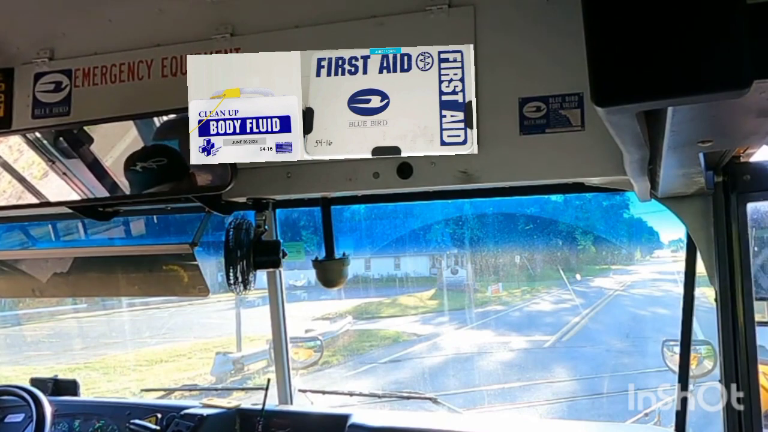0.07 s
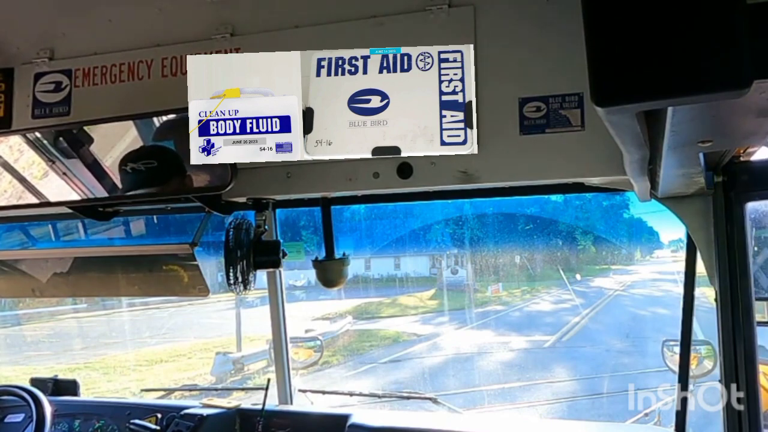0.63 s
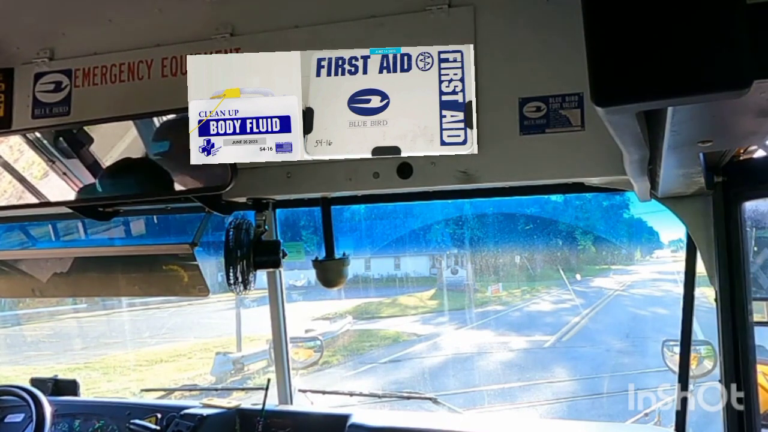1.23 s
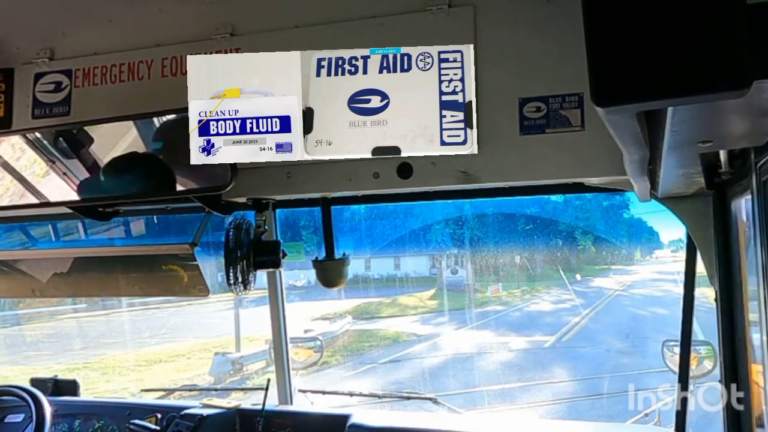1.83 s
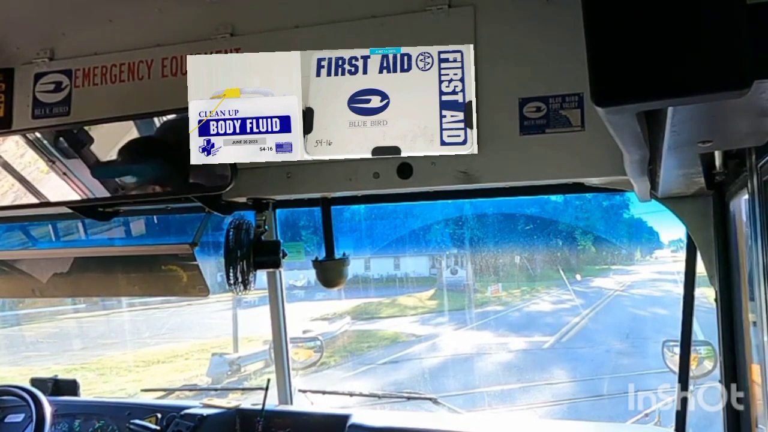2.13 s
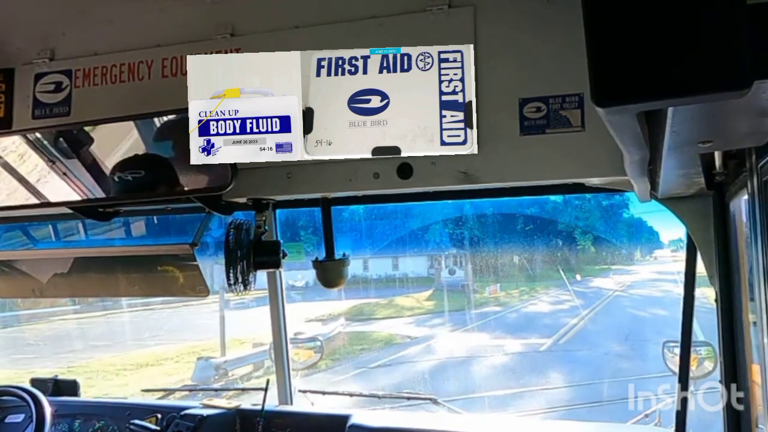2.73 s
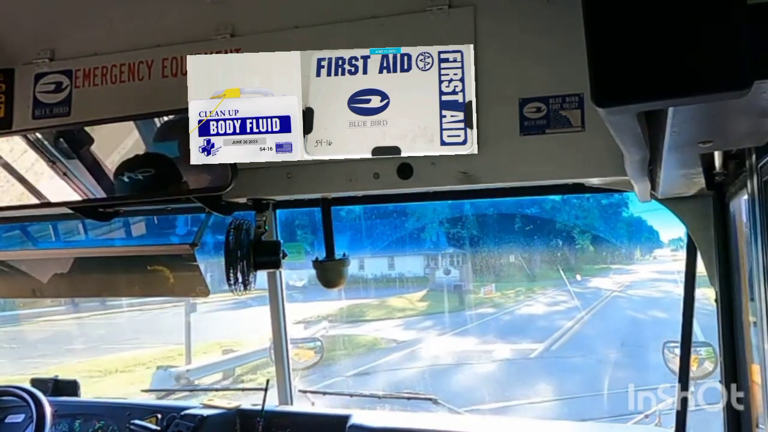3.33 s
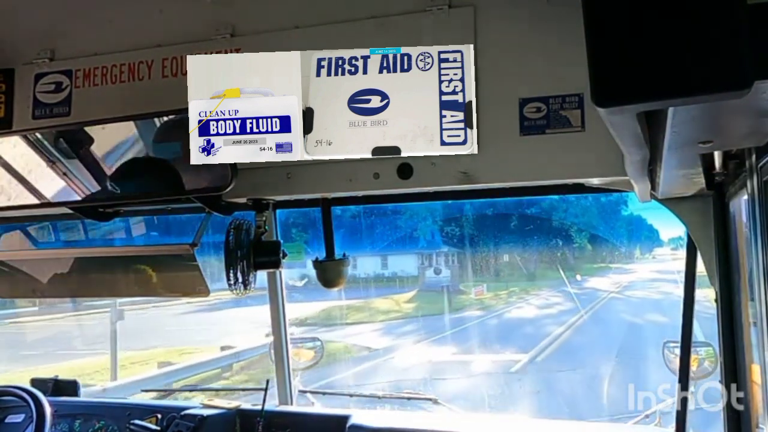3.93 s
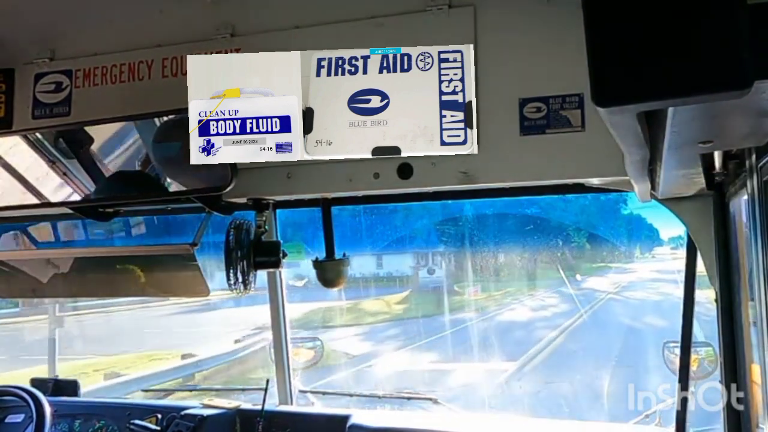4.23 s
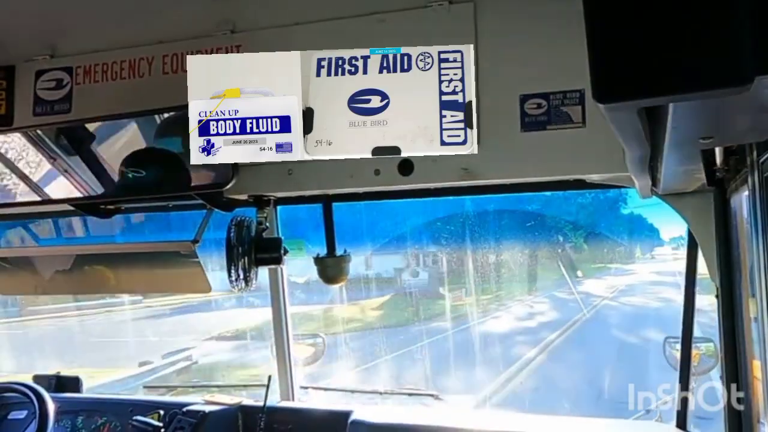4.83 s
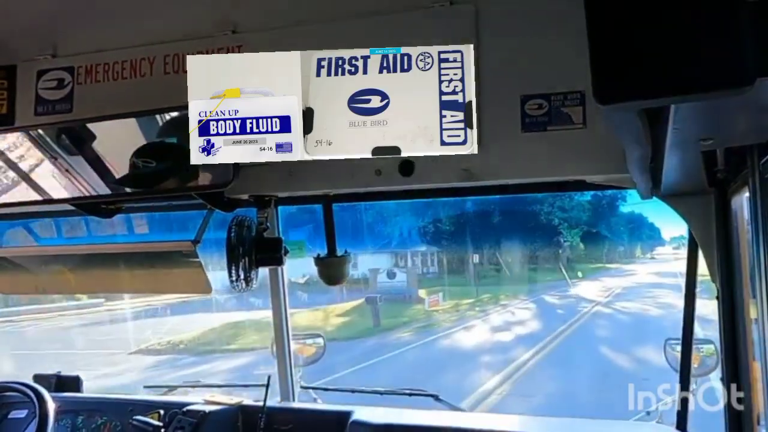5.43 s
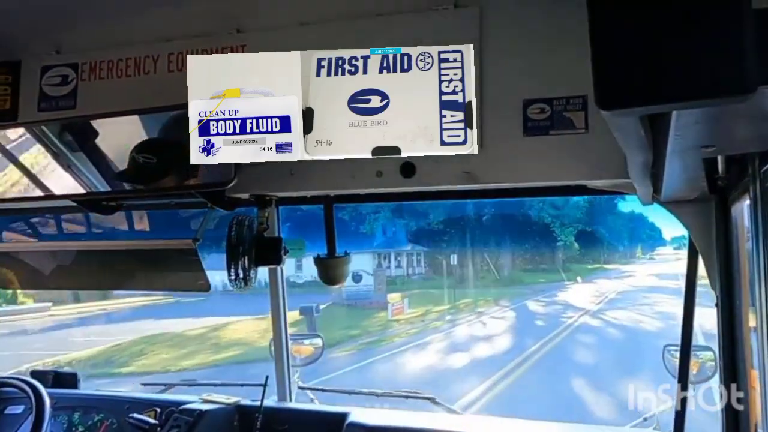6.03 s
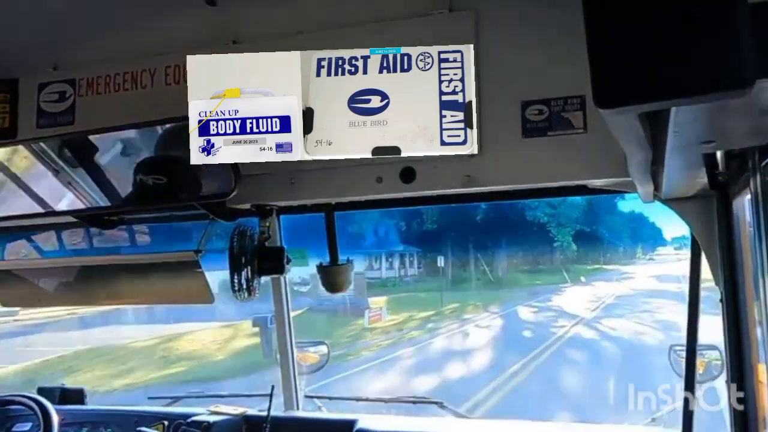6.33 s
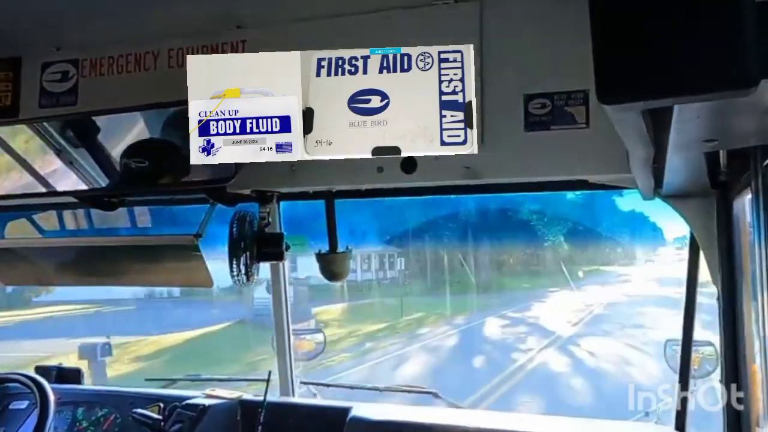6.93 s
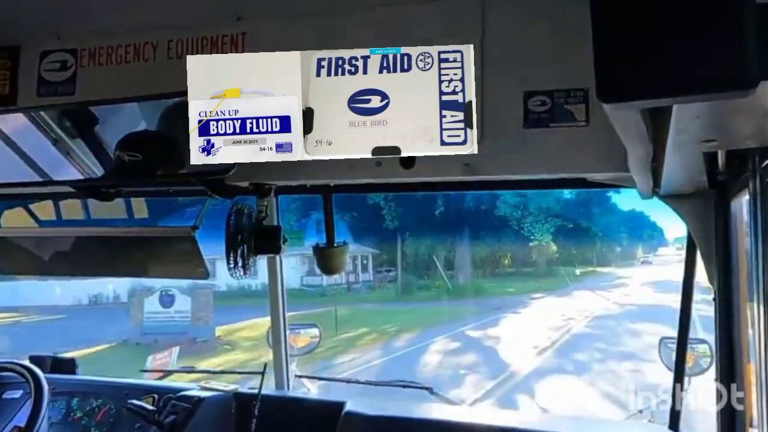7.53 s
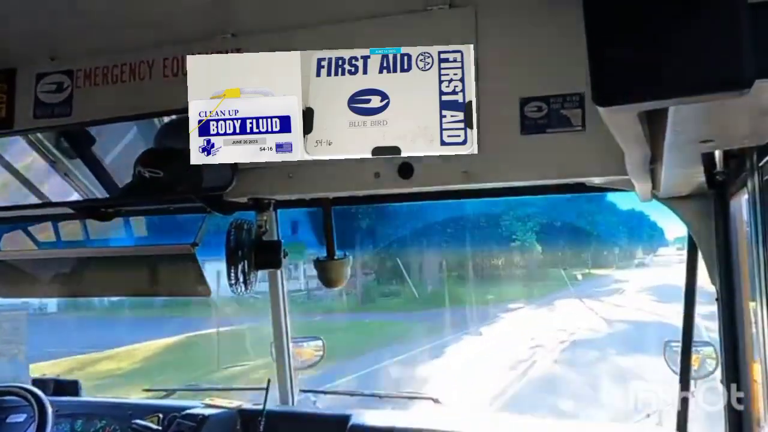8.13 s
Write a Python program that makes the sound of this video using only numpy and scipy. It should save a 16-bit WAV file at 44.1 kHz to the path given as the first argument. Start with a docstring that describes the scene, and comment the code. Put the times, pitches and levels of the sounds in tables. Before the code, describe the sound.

Heard from behind the driver inside a school bus, a diesel engine idles with a low, knocking throb. Air hisses from the door at the start and slowly fades, while the hinge gives several short, thin squeals up to about 1.4 seconds. The door bumps lightly, then shuts with a solid thud at about 2 seconds, and the hiss dies away by 3. The bus pulls away at once, the engine rising in pitch and booming through the cabin as tyre rumble grows. The pitch dips with gear changes at around 4.5 and 6 seconds. Loose trim ticks throughout, most clearly near 4.6 seconds, with a few faint seat chirps. From about 5 to 7.5 seconds, bumps bring low heaves and light panel rattles. A latch clacks sharply near 7.8 seconds as the engine drone swells again.

```python
"""Air hisses from a school bus door over the low throb of an idling six-cylinder diesel.
Heard from behind the driver, the door's hinge squeals and its two leaves thud shut.
The bus pulls away and shifts up twice: the exhaust makes the cabin boom, and each firing of a
cylinder knocks on the engine block. The tyres rumble, bumps shake the panels, and loose
fittings tick, chirp and clack."""
import sys
import numpy as np
from scipy import signal
from scipy.fft import rfft, irfft, next_fast_len
from scipy.io import wavfile
from scipy.ndimage import uniform_filter1d

SR = 44100
rng = np.random.default_rng(int(sys.argv[2]) if len(sys.argv) > 2 else 0)


def generate_wav(sig):
    """Save sig (samples, or channels by samples) to the path in sys.argv[1] as 16-bit PCM at SR."""
    pcm = np.round(np.clip(np.atleast_2d(sig).T, -1, 1) * 32767).astype(np.int16)
    wavfile.write(sys.argv[1], SR, pcm)


N = 361179
T = np.arange(N) / SR

# the tone colour of each noise: (frequency [Hz], relative level [dB])
HEAVE_SPECTRUM = [(8, 0.5), (18, 10.5), (33, 9.5), (45, 5.5), (60, -18), (100, -49)]
TYRE_SPECTRUM = [(35, -2.5), (58, -3), (78, 0.5), (100, -7.5), (123, -2.5), (150, -9), (200, -19.5),
                 (300, -56), (600, -57)]
ROAR_SPECTRUM = [(60, -6), (150, -6), (230, 6), (300, 2.5), (360, -1.5), (430, -3), (500, -8.5), (590, -4),
                 (820, -6.5), (1150, -6.5), (1800, -10.5), (2700, -16), (4000, -51)]
BUZZ_SPECTRUM = [(1500, -13.5), (2600, 0), (3200, -2), (4200, -2), (5300, -3), (6000, -11), (7300, -11),
                 (8200, -20), (10000, -26), (13000, -38.5)]
TICK_SPECTRUM = [(700, -23.5), (2200, -3.5), (3800, 6.5), (5500, 4), (7500, 0), (9500, -10), (13000, -17)]
LATCH_SPECTRUM = [(150, -18), (400, 11.5), (650, 1.5), (1300, 2.5), (1900, 2), (2500, -3), (3200, 5),
                  (4200, -6), (6000, -3.5), (8500, -12), (13000, -25)]
AIR_SPECTRUM = [(500, 1), (1200, -10.5), (2900, 0.5), (5000, -7.5), (6800, -0.5), (7650, -0.5),
                (8300, -3.5), (9500, -6), (11000, -10.5), (12200, -9.5), (13300, -27)]
THUD_SPECTRUM = [(40, -6), (95, 8), (160, 0), (260, 4.5), (380, -8), (520, -1.5), (700, -8.5), (1050, -7),
                 (1500, -7), (2100, -14.5), (3000, -19.5), (4200, -24), (7000, -32.5), (9000, -45),
                 (13000, -44)]
# how alike noise is at the two ears: (frequency [Hz], likeness [0-1])
EAR_LIKENESS = [(60, 1), (130, 0.91), (300, 0.97), (1200, 0.8), (2200, 0.67), (5000, 0.64), (12000, 0.73)]

# bumps in the road: (time [s], heave level [dB], relative rattle rate [dB])
ROAD_BUMPS = [(3, -21, -15), (5.25, -13.5, -13), (5.8, -14, -3), (6.08, -12, -1), (6.3, -26, -3),
              (6.52, -13.5, -0.5), (6.9, -18, -2), (7.25, -16, -10.5)]
# low drones of the body and one faint engine whine:
# (time [s], length [s], start pitch [Hz], end pitch [Hz], level [dB])
GLIDING_HUMS = [(3.257, 0.6, 30.88, 38.3, -20.5), (4.358, 0.45, 67, 79, -22),
                (5.651, 0.33, 116.5, 123, -21.5), (6.178, .6, 169, 180.6, -31), (6.147, 1.9, 430, 412, -51),
                (6.98, 0.26, 116, 107.5, -23.5)]
# ticks of loose trim and chirps of a seat frame: (time [s], relative level [dB])
TRIM_TICKS = [(0.62, -28.5), (0.85, -29.5), (0.865, -34), (1.569, -37), (1.594, -30), (1.755, -31),
              (2.247, -36), (2.429, -31), (3.340, -33.5), (3.379, -34), (3.44, -29.5), (3.455, -36),
              (4.641, -25), (4.655, -24), (4.674, -35), (5.093, -35.5), (5.873, -36), (6.309, -37),
              (6.57, -35.5), (6.984, -34), (7.011, -35), (7.401, -37)]
SEAT_CHIRPS = [(2.525, -44), (3.56, -43.5), (4.60, -45), (5.35, -45), (5.63, -47), (7.61, -52)]
# where the seat frame rings: (frequency [Hz], relative level [dB])
SEAT_RINGS = [(3600, 1.7), (6250, -2)]
# clacks of a latch: (time [s], level [dB], time to fade by 60 dB [s])
LATCH_CLACKS = [(7.836, -19.5, 0.081), (7.845, -25, 0.15)]

# the door bumps and shuts: (time [s], level [dB], time to fade by 60 dB [s], push on the leaf [dB])
DOOR_THUDS = [(0.71, -29.5, 0.14, -24), (1.602, -31.5, 0.18, -35), (2.06, -13, 0.23, -18.5),
              (2.094, -19.5, 0.21, -22)]
# squeals of the hinge: (time [s], length [s], start pitch [Hz], end pitch [Hz], level [dB],
# relative overtone level [dB], wobble [share of the pitch])
HINGE_SQUEALS = [(0.03, 0.205, 830, 730, -46, -22, .014), (0.755, 0.11, 2750, 2660, -38, -4.5, .005),
                 (0.869, .085, 2432, 2364, -39.5, -10, .006), (.98, 0.12, 1240, 1140, -41, -27, .012),
                 (1.19, 0.075, 2070, 2006, -39, -25, .02), (1.276, 0.045, 1976, 2080, -41, -23, .018),
                 (1.352, 0.039, 2070, 2040, -42.5, -23, .014)]
# where a door leaf rings, and where the knocks ring in the engine block and the cabin: (frequency [Hz], width
# [Hz], relative level [dB])
LEAF_RINGS = [(95.4, 5, 3.5), (283, 35, -1), (500, 100, -34), (1060, 140, -31), (1500, 81, -40)]
KNOCK_RINGS = [(557, 83, -10.5), (1034, 51, -7), (1218, 45, -5.5), (1377, 14.2, 7.5), (1465, 126, 1.5),
               (1506.4, 64, 7), (1597, 71, -6.5), (1906, 147, -11.5), (2162, 12, -4), (2216, 21, -5),
               (2355, 19, -6), (2637, 47, -6.5), (2824, 26, -9.5)]

# the engine through three gears: (time [s], firing rate [Hz], firing tone level [dB])
ENGINE_RUN = [(2.15, 40.15, -20), (2.55, 60.5, -19), (2.85, 71, -23), (3.3, 84.5, -21), (3.6, 89.7, -20),
              (3.95, 92.5, -19.5), (4.3, 92.7, -21), (4.6, 87.5, -18), (5.0, 82.5, -19), (5.55, 95, -21),
              (5.8, 101, -30), (6.25, 76.5, -30), (6.6, 80, -28), (6.9, 79, -34), (7.17, 78, -21),
              (7.55, 77, -34), (7.78, 80.5, -18), (8.19, 82.5, -14)]
# its other tones: (multiple of the firing rate, relative level at idle [dB], under load [dB])
ENGINE_TONES = [(1 / 2, -15, -13), (3 / 2, -18, -2), (2, -5, -6.5), (5 / 2, -13, -14), (3, -11, -7),
                (7 / 2, -20, -15), (4, -18, -5), (9 / 2, -17, -2), (5, -16, -11), (11 / 2, -13, -10),
                (6, -10, -3)]
# how the bus shapes the low boom and the higher growl: (frequency [Hz], gain [dB])
CABIN_BOOM = [(20, -17.5), (40, -28), (60, -29), (80, -21.5), (100, -25), (121, -21), (136, -32),
              (162, -35.5), (178, -31.5), (205, -41), (240, -40), (280, -38), (330, -49), (720, -51)]
BODY_GROWL = [(480, -5.5), (600, 7.5), (700, -6.5), (850, -9), (1100, 0.5)]
# each cylinder's knock, in firing order: (relative level [dB])
CYLINDER_KNOCKS = [-4, -1, -3, -6, 4, -5]
# how hard the engine works: (time [s], knock level [dB])
ENGINE_EFFORT = [(1.95, -41.5), (2.27, -48.5), (2.9, -35.5), (3.3, -37.5), (4, -37.5), (4.45, -32.5),
                 (4.9, -36), (6.85, -35.5), (7.3, -41), (7.8, -38.5)]

PULL_AWAY_S = 2.15


def from_db(db):
    """Turn decibels into a factor to multiply by."""
    return 10 ** (np.asarray(db) / 20)


def unit_power(x):
    """Scale a signal to an average power of one."""
    return x / np.sqrt(np.mean(x ** 2) + 1e-20)


def over_time(rows):
    """Join a table's points with lines, giving a value at every sample."""
    times, *columns = np.transpose(rows)
    return [np.interp(T, times, column) for column in columns]


def at_hz(points, hz):
    """Read a table at any frequency, with octaves evenly spaced."""
    frequencies, values = np.transpose(points)
    return np.interp(np.log(hz), np.log(frequencies), values)


def drift(rate_hz):
    """A smooth random wander, about one in size."""
    step, warm_up = 40, 2000
    pole = np.exp(-2 * np.pi * step * rate_hz / SR)
    white = rng.standard_normal(N // step + warm_up + 2)
    slow = signal.lfilter([1], [1, -2 * pole, pole * pole], white)[warm_up:]
    return np.interp(np.arange(N) / step, np.arange(len(slow)), unit_power(slow))


def noise(spectrum):
    """Stereo noise of a given colour; the ears differ more in the treble."""
    size = next_fast_len(N, real=True)
    hz = np.maximum(np.arange(size // 2 + 1) * SR / size, 1)
    mid, side = rfft(rng.standard_normal((2, size)))
    alike = np.clip(at_hz(EAR_LIKENESS, hz), 0, 1)
    pair = np.sqrt(1 + alike) * mid + np.sqrt(1 - alike) * side * [[1], [-1]]
    top_cut = np.maximum(hz / spectrum[-1][0], 1) ** 4   # fades above the last point
    gain = from_db(at_hz(spectrum, hz)) / top_cut
    return unit_power(irfft(pair * gain, size)[:, :N])


def resonate(x, hz, width_hz):
    """Ring at one pitch; a narrower width rings longer."""
    r = np.exp(-np.pi * width_hz / SR)
    feedback = [1, -2 * r * np.cos(2 * np.pi * hz / SR), r * r]
    return signal.lfilter(np.array([1, 0, -1]) * (1 - r * r) / 2, feedback, x)


def blows(rows, attack_s):
    """The loudness of blows that rise fast, then fade by 60 dB in t60 seconds."""
    power = np.zeros(N)
    for start_s, db, t60 in rows:
        at = int(start_s * SR)
        t = T[:N - at]
        power[at:] += (from_db(db - 60 * t / t60) * (1 - np.exp(-t / attack_s))) ** 2
    return np.sqrt(power)


def cabin(x, echo_db, t60, spread=0.49):
    """Glass and steel send back many quick echoes; the overall power stays the same."""
    t = T[:SR // 4]
    shared, own = rng.standard_normal((2, len(t)))
    echoes = (shared + spread * own * [[1], [-1]]) * from_db(-60 * t / t60) * (t > .002)
    echoes *= from_db(echo_db) / np.sqrt(np.sum(echoes ** 2, axis=1, keepdims=True))
    reflected = signal.fftconvolve(np.atleast_2d(x), echoes, axes=1)[:, :N]
    return (x + reflected) / np.sqrt(1 + from_db(echo_db) ** 2)


def gliding_hum(start_s, length_s, start_hz, end_hz, waver=0.02574):
    """A gliding hum swells and fades: low drones of the body, and a faint engine whine near 420 Hz."""
    progress = np.clip((T - start_s) / length_s, 0, 1)
    hz = (start_hz + (end_hz - start_hz) * progress) * (1 + waver * drift(9.64))
    swell = np.sqrt(np.pi * np.abs(np.sin(np.pi * progress)))
    return swell * np.sin(2 * np.pi * np.cumsum(hz) / SR)


def road_shaking(load, smooth_heave_db=-32.5, smooth_jolt_db=-12, rise_s=0.033, t60=1.85):
    """How much the road rocks the body (heave) and shakes the panels (jolt)."""
    heave = blows([(s, db, t60) for s, db, _ in ROAD_BUMPS], rise_s)
    jolt = blows([(s, db, t60) for s, _, db in ROAD_BUMPS], rise_s)
    return heave + from_db(smooth_heave_db) * load, jolt + from_db(smooth_jolt_db) * load


def road(heave, load, standing_db=-29, rolling_db=-22):
    """The body heaves, hums come and go, and the rumble grows once the tyres roll."""
    rumble_db = standing_db + (rolling_db - standing_db) * load
    hums = sum(from_db(db) * gliding_hum(*glide) for *glide, db in GLIDING_HUMS)
    return heave * noise(HEAVE_SPECTRUM) + from_db(rumble_db) * noise(TYRE_SPECTRUM) + hums


def body_roar(bursts, effort_db, jolt, base_db=-40, throb=0.17):
    """The body's roar throbs with the firings and grows with effort and bumps."""
    level_db = base_db + 0.25 * effort_db + 3 * jolt
    return from_db(level_db) * noise(ROAR_SPECTRUM) * unit_power(1 + throb * bursts)


def panel_rattle(bursts, effort_db, load, jolt, buzz_db=-47.5, rattle_db=-56, hits_per_s=520, t60=0.055):
    """Panels buzz with the engine and rattle at random as bumps shake them."""
    hits = (rng.random(N) < hits_per_s * jolt / SR) * rng.random(N)
    rattle = signal.lfilter([1], [1, -from_db(-60 / (t60 * SR))], hits + 1e-18)
    rattle = unit_power(uniform_filter1d(rattle, size=SR // 150))   # soft contacts
    level_db = buzz_db + 0.53 * effort_db - 14.5 * (1 - load)   # quieter at idle
    buzz = cabin(noise(BUZZ_SPECTRUM), echo_db=-7.5, t60=0.24) * unit_power(1 + 0.3 * bursts)
    buzz *= from_db(level_db + 0.8 * drift(32))   # a slight flutter
    return buzz + from_db(rattle_db) * noise(TICK_SPECTRUM) * rattle


def loose_fittings(tick_gain_db=7, tick_t60=0.019, chirp_gain_db=5, chirp_t60=.09):
    """Trim ticks, a rubbing seat frame chirps softly, and a latch clacks."""
    ticks = from_db(tick_gain_db) * noise(TICK_SPECTRUM)
    ticks *= blows([(s, db, tick_t60) for s, db in TRIM_TICKS], attack_s=0.0016)
    rub = noise(TICK_SPECTRUM)
    frame = sum(from_db(db) * unit_power(resonate(rub, hz, width_hz=130)) for hz, db in SEAT_RINGS)
    chirps = from_db(chirp_gain_db) * unit_power(frame)
    chirps *= blows([(s, db, chirp_t60) for s, db in SEAT_CHIRPS], attack_s=0.0035)
    echoing = cabin(ticks + chirps, echo_db=0, t60=0.12)
    return echoing + noise(LATCH_SPECTRUM) * blows(LATCH_CLACKS, attack_s=0.001)


def hinge_squeal(start_s, length_s, start_hz, end_hz, db, overtone_db, jitter):
    """The hinge sticks and slips, making a gliding note with a shaky pitch and grip."""
    progress = np.linspace(0, 1, int(length_s * SR))
    tremble = unit_power(uniform_filter1d(rng.standard_normal((2, SR // 4)), size=90))
    wobble, grip = tremble[:, :len(progress)]
    hz = (start_hz + (end_hz - start_hz) * progress) * (1 + jitter * wobble)
    phase = 2 * np.pi * np.cumsum(hz) / SR
    swell = np.sqrt(2 * np.abs(np.sin(np.pi * progress))) * unit_power(1 + .5 * grip)
    out, at = np.zeros(N), int(start_s * SR)
    out[at:at + len(progress)] = swell * (np.sin(phase) + from_db(overtone_db) * np.sin(2 * phase))
    return from_db(db) * out


def door_leaves(seal_hz=2500):
    """The leaves squeal on their hinge, thud against the frame and ring."""
    squeals = sum(hinge_squeal(*row) for row in HINGE_SQUEALS)
    hits = np.zeros(N)
    for s, _, _, push_db in DOOR_THUDS:
        hits[int(s * SR)] = from_db(push_db)
    rubber_seal = signal.butter(2, seal_hz, fs=SR, output="sos")   # softens each hit
    hits = signal.sosfilt(rubber_seal, hits + 1e-18)
    rings = sum(from_db(db) * resonate(hits, hz, width) * SR / (2 * np.pi * width)
                for hz, width, db in LEAF_RINGS)
    thuds = blows([row[:3] for row in DOOR_THUDS], attack_s=0.00096)
    return cabin(squeals + rings, echo_db=2, t60=0.2) + noise(THUD_SPECTRUM) * thuds


def door_air(rush_peak_s=0.36, whistle_end_s=1.57, shut_s=2.1, valve_closes_s=2.83):
    """Air leaves the door's cylinder with a rush, a hiss, a whistle and a thin, rising leak."""
    rush_db = np.minimum(3 * (T - rush_peak_s), 7 * (rush_peak_s - T))   # builds, then fades
    rush = from_db(-41 + rush_db) * noise(BUZZ_SPECTRUM)
    hiss = from_db(-40.5 - 4.5 * T) * noise(AIR_SPECTRUM)
    flow = (rush + hiss) * from_db(-3.5 * (T > shut_s))   # drops once the door is shut
    whistle = from_db(-52.5) * unit_power(resonate(noise(AIR_SPECTRUM), hz=7730, width_hz=240))
    whistle *= np.sqrt(np.abs(np.sin(np.pi * np.minimum(T / whistle_end_s, 1))))
    leak_hz = 7500 + 800 * T
    leak_tone = np.sin(2 * np.pi * np.cumsum(leak_hz) / SR)
    leak = from_db(-63) * unit_power(noise([(900, 0)]) * leak_tone)   # a band of noise around the tone
    swing = from_db(-40 + rush_db / 2) * noise(ROAR_SPECTRUM)   # the leaves rumble as the rush moves them
    valve = from_db(-32 * np.maximum(T - valve_closes_s, 0))
    return valve * (swing + cabin(flow + whistle + leak, echo_db=-2.5, t60=0.069))


def engine_speed(idle_hz=40.15, idle_start_db=-24, swell_db_per_s=2.5):
    """The firing rate and the level of its tone: idling, then through the gears."""
    hz, db = over_time(ENGINE_RUN)
    idling = T < PULL_AWAY_S
    level_db = np.where(idling, idle_start_db + swell_db_per_s * T, db)
    return np.where(idling, idle_hz, hz), uniform_filter1d(level_db, size=SR // 10)


def combustion(firings, firing_hz, burst_s=0.0035, floor=0.58, uneven_db=2):
    """Each firing is a short burst, and the cylinders push with unequal force."""
    number = firings.astype(int)
    force_db = np.array(CYLINDER_KNOCKS)[number % len(CYLINDER_KNOCKS)]
    force_db = force_db + uneven_db * rng.standard_normal(N)[number]
    since_firing_s = (firings % 1) / firing_hz
    return unit_power(floor + from_db(force_db) * np.exp(-since_firing_s / burst_s))


def engine_growl(firings, firing_hz, gear_db, base_db=-55, full_at_hz=90, db_per_hz=0.55, waver_db=3):
    """High engine tones come out as the engine speeds up, coloured by the body."""
    level_db = base_db + gear_db + db_per_hz * np.minimum(firing_hz - full_at_hz, 0)
    tones = np.zeros(N)
    for multiple in np.arange(13, 27) / 2:
        tone_db = at_hz(BODY_GROWL, multiple * firing_hz) + waver_db * drift(1)
        tones += from_db(tone_db) * np.cos(2 * np.pi * (multiple * firings + rng.random()))
    return from_db(level_db) * tones


def diesel_knock(bursts, load, cover_hz=1460, cover_width_hz=210, hood_hz=3100):
    """Bursts set the block and the cabin ringing; their sharp starts clack on the valve cover."""
    drive = bursts * noise([(300, 0.011), (4000, 0)])
    rings = sum((-1) ** k * from_db(db) * resonate(drive, hz, width)
                for k, (hz, width, db) in enumerate(KNOCK_RINGS))
    starts = np.maximum(np.diff(bursts, prepend=bursts[0]), 0)
    clack = resonate(resonate(starts, cover_hz, cover_width_hz), cover_hz, cover_width_hz)
    knock = unit_power(rings) + from_db(-2 - 10 * load) * unit_power(clack)   # clacks most at idle
    hood = signal.butter(4, hood_hz, fs=SR, output="sos")   # the hood stops the treble
    muffled = signal.sosfilt(hood, knock)
    running_power = uniform_filter1d(np.mean(muffled ** 2, axis=0), size=SR // 2)
    return muffled / np.sqrt(running_power)


def engine_boom(firings, firing_hz, firing_db, load, gear_db):
    """The exhaust hums; its other tones swell as they pass pitches the cabin rings at."""
    phase = 2 * np.pi * (firings - .6)
    waver_db = 0.17 + load   # steadier at idle
    tones = from_db(firing_db + 1.15 * waver_db * drift(0.98)) * np.cos(phase)
    for multiple, idle_db, load_db in ENGINE_TONES:
        level_db = idle_db + (load_db - idle_db) * load + gear_db * (multiple > 1)
        level_db += at_hz(CABIN_BOOM, multiple * firing_hz) + waver_db * drift(2.14)
        offset = 2 * np.pi * rng.random() * (multiple > 3)
        tones += from_db(level_db) * np.cos(multiple * phase + offset)
    return np.sqrt(2) * tones * from_db([[.2], [-.2]])   # a touch louder on the left


def scene(take_up_s=0.81, upshift_s=4.4, upshift_takes_s=.5, ordinary_knock_db=-37):
    """The engine's firings and the road shake the bus; the door and fittings join in."""
    firing_hz, firing_db = engine_speed()
    knock_db, = over_time(ENGINE_EFFORT)
    effort_db = knock_db - ordinary_knock_db
    load = np.clip((T - PULL_AWAY_S) / take_up_s, 0, 1)   # 0 idling, 1 pulling
    gear_db = -5 * np.clip((T - upshift_s) / upshift_takes_s, 0, 1)   # overtones ease after first gear
    heave, jolt = road_shaking(load)
    firings = np.cumsum(firing_hz) / SR + .13   # a running count
    uneven_firings = firings + 0.0056 * drift(10)   # the crankshaft turns unevenly
    bursts = combustion(firings, firing_hz)
    engine = engine_boom(uneven_firings, firing_hz, firing_db, load, gear_db)
    engine += engine_growl(uneven_firings, firing_hz, gear_db)
    engine += from_db(knock_db) * diesel_knock(bursts, load)
    body = body_roar(bursts, effort_db, jolt) + panel_rattle(bursts, effort_db, load, jolt)
    return engine + body + road(heave, load) + door_air() + door_leaves() + loose_fittings()


def record(dry, cutoff_hz=13700):
    """Cut off the highest treble steeply."""
    return signal.sosfilt(signal.ellip(10, .1, 90, cutoff_hz, fs=SR, output="sos"), dry)


dry = scene()
out = record(dry)
generate_wav(out)
```